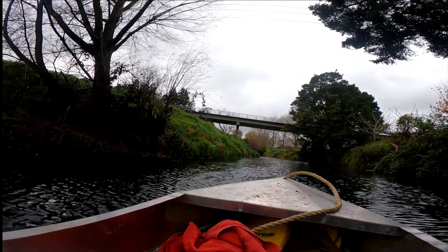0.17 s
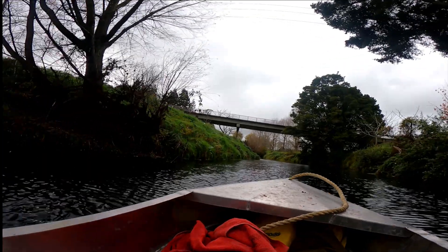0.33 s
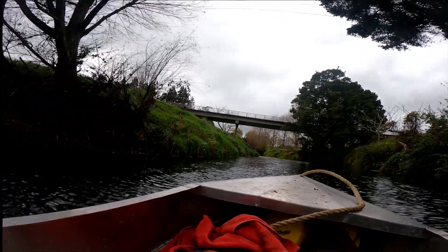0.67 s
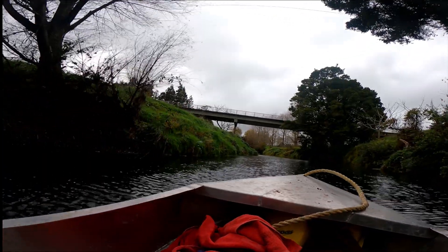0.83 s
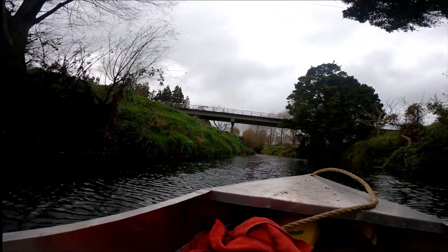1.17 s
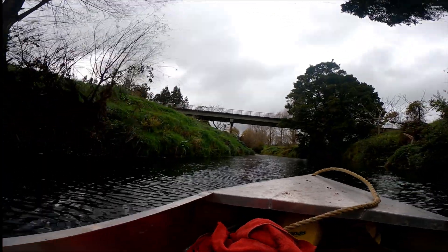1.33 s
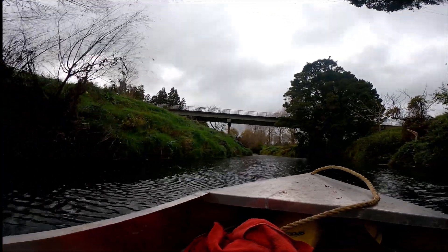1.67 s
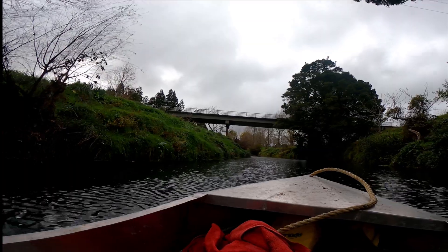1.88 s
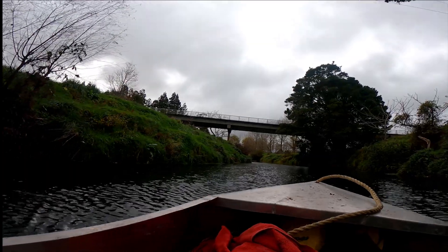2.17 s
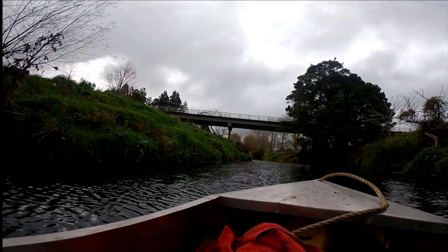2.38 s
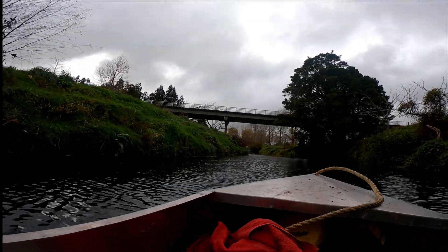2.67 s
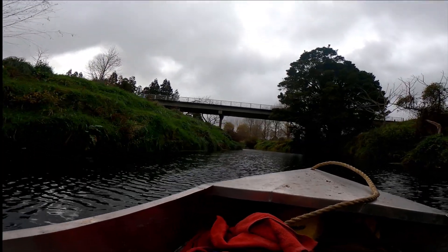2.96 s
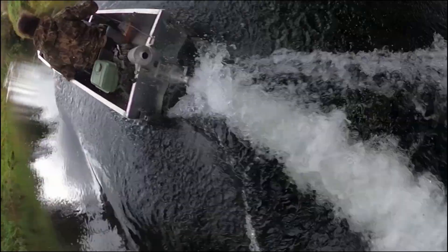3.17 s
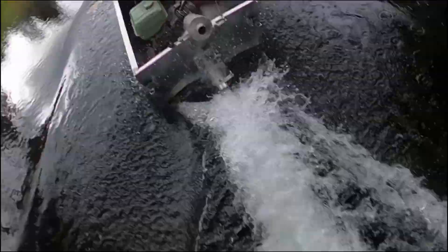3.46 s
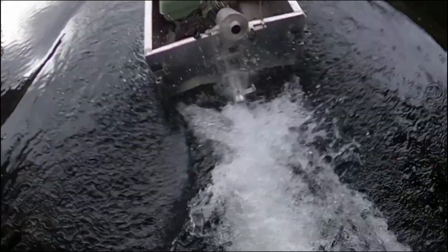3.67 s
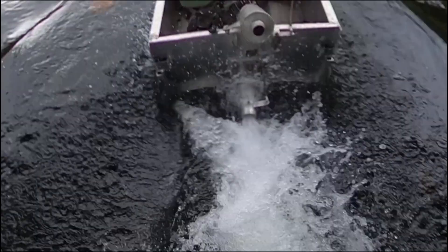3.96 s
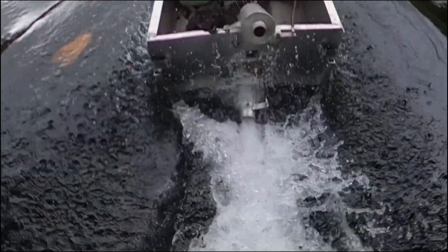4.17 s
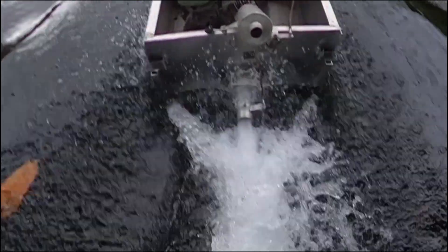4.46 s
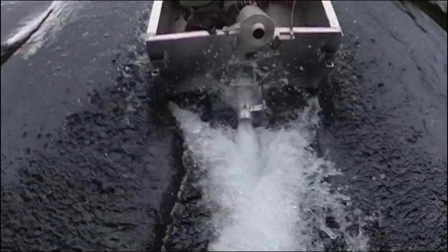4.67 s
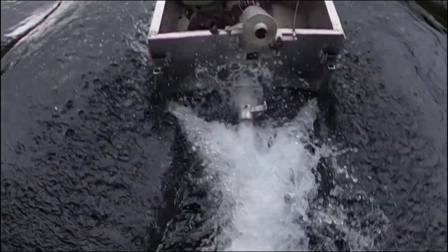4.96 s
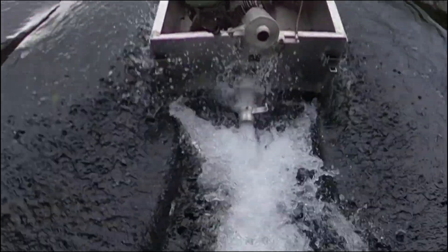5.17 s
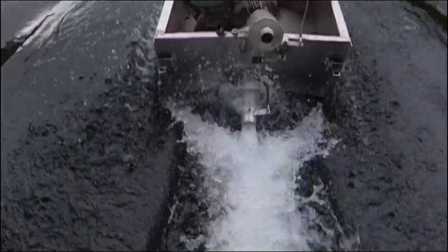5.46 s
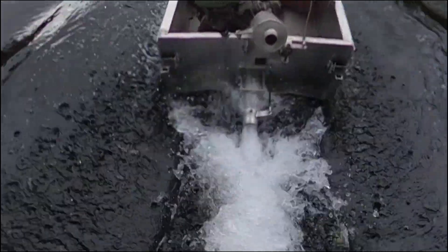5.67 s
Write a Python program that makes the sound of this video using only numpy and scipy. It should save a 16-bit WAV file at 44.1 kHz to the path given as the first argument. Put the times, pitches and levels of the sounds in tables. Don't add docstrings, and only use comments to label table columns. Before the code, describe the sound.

Rapid engine putter heard through a rattling metal hull, switching abruptly to crisp exhaust pops, hiss and churning white water at the stern.

```python
import sys
import numpy as np
from scipy import signal
from scipy.fft import rfft, irfft, next_fast_len
from scipy.io import wavfile
from scipy.ndimage import uniform_filter1d, map_coordinates

SR = 44100
rng = np.random.default_rng(int(sys.argv[2]) if len(sys.argv) > 2 else 0)


def unload_wav(signal):
    wavfile.write(
        sys.argv[1],
        SR,
        np.round(np.clip(np.atleast_2d(signal).T, -1, 1) * 32767).astype(np.int16),
    )


def volts_from_db(level):
    exponent = np.asarray(level, float) / 20
    return 10 ** exponent


N = 256662

CUT = 3.1625
COARSE = np.arange(0, N + 200, 200)


def unit(x):
    return x / np.sqrt(np.mean(x ** 2) + 1e-20)


def curves(rows):
    s, *columns = np.transpose(rows)
    return [np.interp(np.arange(N) / SR, s, column) for column in columns]


def wobble(rate):
    knots = rng.standard_normal(300)
    return np.interp(np.arange(N), COARSE, map_coordinates(knots, [COARSE * min(rate, 40) / SR]))


def swell(middle, length, at=np.arange(N)):
    return np.exp(-np.abs((at / SR - middle) / length * 2) ** 3)


def filtered(x, response):
    m = next_fast_len(N + 8192)
    return irfft(rfft(x, m) * response(np.fft.rfftfreq(m, 1 / SR)), m)[:N]


def noise(spectrum, patchy_db=0., rings=()):
    z = signal.stft(rng.standard_normal(N + 512), nperseg=512)[2]
    patches = uniform_filter1d(rng.standard_normal(z.shape), 6, 0)
    patches = unit(uniform_filter1d(patches, 8, 1))
    white = signal.istft(z * volts_from_db(patchy_db * patches), nperseg=512)[1][:N]
    f, db = np.transpose(spectrum)

    def colour(hz):
        bumps_db = sum(lift_db / (1 + ((hz - c) / w * 2) ** 2) for c, w, lift_db in rings)
        return volts_from_db(np.interp(np.log(hz + 1), np.log(f), db, right=-120) + bumps_db)

    return unit(filtered(white, colour))


def orders(cycle, table, twist, spread, unsteady, drift_db):
    total = np.zeros(N)
    twist = twist + np.zeros(501)
    on = np.gradient(cycle) > 0
    for k, db in table:
        k = round(k)
        share = unsteady * (1 + k / 10)
        wander = np.exp(1j * spread * k / 6 * rng.standard_normal())
        wander = wander + share * (wobble(4.04) + 1j * wobble(4.15))
        turning = np.exp(1j * (2 * np.pi * k * cycle[on] + twist[k]))
        total[on] += volts_from_db(db + drift_db[k][on]) * np.real(wander[on] * turning)
    return total / np.sqrt(sum(volts_from_db(2 * db) for _, db in table) / 2)


def burst(cycle, start, rise, fall, scatter_db, jitter):
    size, late = np.clip(rng.standard_normal((80, 2)).T, -2, 2)
    shifted = cycle - start + 2 * jitter
    k = np.floor(shifted).astype(int) + 3
    age = np.clip(shifted % 1 - jitter * (2 + late[k]), 0, 1)
    attack = 1 - np.exp(-(age / rise) ** 2)
    return volts_from_db(scatter_db * size[k]) * np.exp(-age / fall) * attack * (1 - age ** 6)


def spike(cycle, at, rise, fall, scatter_db, jitter):
    size, late = np.clip(rng.standard_normal((80, 2)).T, -2, 2)
    k = np.round(cycle - at).astype(int)
    age = cycle - at - k - jitter * late[k + 3]
    return volts_from_db(scatter_db * size[k + 3]) * np.exp(-np.abs(age) / np.where(age < 0, rise, fall))


def each(cycle, lead, levels_db):
    k = np.floor(cycle + lead).astype(int)
    return volts_from_db(levels_db[np.clip(k, 0, len(levels_db) - 1)])


# middle in seconds, length in seconds, panel pitch in Hz, lift in dB.
PANEL_WAVES = [(.2, 0.19, 85, 5.5), (0.302, 0.12, 402, 5), (.5, 0.34, 130, 0.5), (1.104, 0.27, 405, 15.5),
               (1.55, 0.58, 391, 3), (2.8, 0.94, 396, -3), (0.753, 0.62, 126, -2), (1.14, 0.83, 140.7, 9),
               (1.3, 0.57, 86, -7), (1.163, 0.89, 184, -3.5), (1.47, .25, 124, 5), (1.7, 0.17, 77, 5),
               (1.762, 0.73, 190, 6.5), (1.78, 0.19, 147, 3.5), (1.8, .5, 263, 3.5), (2.21, 0.16, 189, 6.5),
               (2.396, 0.52, 90.5, 4), (2.5, 0.2, 147, 3), (2.75, 0.19, 121, -2), (2.947, 0.12, 192, 5.5),
               (3.302, 0.19, 152, 4.5), (.1, 0.36, 273, -6), (.65, 0.14, 190, 5),
               (1.245, 0.43, 294.5, 15.5), (1.448, 0.15, 293, 6.5), (2.803, 0.45, 187, 2.5),
               (5.5, 0.16, 270, 2.5), (4.35, 0.51, 90, 5), (4.953, 0.34, 165, 2.5), (1.6, .3, 296, 7),
               (3.35, 0.25, 268, 11), (3.907, 0.31, 268, 9), (4.11, 0.13, 69, -23), (4.25, 0.37, 134, 8),
               (4.7, 0.42, 265, -14), (5.102, 0.21, 145, -20), (5.55, .35, 139, -9)]


def panels(cycle, at_s, table):
    order = np.round(np.transpose(table)[0]).astype(int)
    order_hz = order[:, None] * np.gradient(cycle)[round(at_s * SR)] * SR
    s, length, hz, lift_db = np.transpose(PANEL_WAVES)
    panel_width_hz = 29.5
    reach = np.exp(-((order_hz - hz) / panel_width_hz * 2) ** 4)
    lifts = reach * lift_db @ swell(s[:, None], length[:, None], COARSE)
    return {k: np.interp(np.arange(N), COARSE, lift) for k, lift in zip(order, lifts)}


# time in seconds, engine cycles counted.
BOW_TURNS = [(0, -.968), (.287, 3.975), (.862, 13.759), (1.437, 23.659), (2.3, 38.466), (3.2, 53.9)]


def bow_cycle():
    return curves(BOW_TURNS)[0]


# multiple of the firing rate, level in dB.
BOOM_ORDERS = [(1, -17), (2, -13), (3, -4.5), (4, -5.5), (5, 0), (6, -2), (7, -4), (8, 0), (9, -0.5),
               (10, -2), (11, 0), (12, -4), (13, -25.5), (14, -18), (15, -16), (16, -8), (17, -18.5),
               (18, -16.5)]


def boom(cycle):
    lift_db = panels(cycle, 1, BOOM_ORDERS)
    return volts_from_db(-16) * orders(cycle, BOOM_ORDERS, twist=3., spread=9., unsteady=.1, drift_db=lift_db)


# pitch in Hz, level in dB per Hz.
ROAR_SPECTRUM = [(15, -63), (25, -31.5), (75, -8), (185, -3), (229, -5), (283, -6), (344, -12.5),
                 (393, -11.5), (624, -13.5), (757, -20), (1030, -22), (1110, -23), (2500, -43.5),
                 (3250, -77), (5500, -120)]
# centre in Hz, width in Hz, lift in dB.
HULL_RESONANCES = [(172, 19, .3), (291, 42, 4.5), (408, 35, 3.5), (624, 40, 2.5), (965, 92, 5),
                   (1460, 80, 2), (2900, 270, 2)]
# time in seconds, level in dB.
HULL_SHAKING = [(0, -0.5), (.9, 1), (1.25, -2), (1.8, 0), (2.1, -1.3), (2.5, 1.8), (3.2, 0)]
# time in seconds, clatter in dB, rattle in dB.
HULL_FIRINGS = [(0.056, -2.0, -2.0), (0.114, -3.5, -2.0), (0.172, -3.0, -4.5), (0.23, -2.0, -2.0),
                (0.288, -0.5, -1.0), (0.347, -0.0, 0.5), (0.406, -0.5, -0.0), (0.465, 0.0, -0.5),
                (0.524, -2.0, -0.5), (0.582, -1.0, 1.5), (0.641, 1.5, 2.0), (0.7, 3.0, 2.5),
                (0.759, 1.0, 1.0), (0.817, 3.0, 1.5), (0.876, 0.0, 2.5), (0.934, -3.0, 1.0),
                (0.992, -0.5, 1.0), (1.05, -0.5, 1.5), (1.108, 0.0, 0.0), (1.166, -1.5, 0.5),
                (1.224, 0.5, -2.5), (1.283, 0.0, -1.0), (1.341, -3.0, -0.5), (1.399, -2.0, -0.5),
                (1.457, -1.5, -1.0), (1.515, -2.0, 0.5), (1.573, 1.0, -0.5), (1.632, -0.0, 0.5),
                (1.69, 0.0, 0.5), (1.748, -1.0, 0.0), (1.807, 0.5, 1.5), (1.865, 0.5, 1.5),
                (1.923, 0.5, -0.5), (1.981, -1.5, -1.0), (2.04, 2.5, -1.0), (2.098, -2.0, 1.5),
                (2.156, -1.0, 0.5), (2.215, 1.0, -1.0), (2.273, -2.0, 0.0), (2.331, 2.5, -0.0),
                (2.389, 0.5, -1.0), (2.448, 0.0, -0.0), (2.506, 3.0, 0.5), (2.564, -0.0, -0.5),
                (2.623, 1.0, -0.5), (2.681, 1.0, 2.0), (2.739, 0.0, 0.5), (2.798, 1.0, -0.5),
                (2.856, 0.0, 1.5), (2.914, 1.0, 1.0), (2.973, -1.0, 0.0), (3.031, 0.0, -1.0),
                (3.089, -1.0, -0.5)]


def roar(cycle):
    shaking_db, = curves(HULL_SHAKING)
    clatter_db = np.transpose(HULL_FIRINGS)[1]
    whole = noise(ROAR_SPECTRUM, patchy_db=0.28, rings=HULL_RESONANCES)
    deep = filtered(whole, lambda hz: 1 / (1 + (hz / 700) ** 4))
    chug = .5 + burst(cycle, start=-.1, rise=.07, fall=.45, scatter_db=2., jitter=.02)
    clatter = .75 + burst(cycle, start=-.3, rise=.12, fall=.5, scatter_db=.5, jitter=.03)
    clatter = clatter + .4 * spike(cycle, at=.03, rise=.04, fall=.08, scatter_db=2., jitter=.05)
    clatter = clatter * each(cycle, .35, 0.62 * clatter_db)
    return volts_from_db(-18.5) * (deep * chug * volts_from_db(shaking_db) + 1.135 * (whole - deep) * clatter)


# pitch in Hz, level in dB per Hz.
RATTLE_SPECTRUM = [(1060, -34.5), (1800, -4), (2490, -3.5), (4270, -6), (5450, -9.5), (6530, -10),
                   (8480, -16.5), (11200, -31), (12400, -25.5), (13800, -30), (15500, -36)]


def rattle(cycle):
    shake_db = np.transpose(HULL_FIRINGS)[2]
    shake = .62 + burst(cycle, start=-.42, rise=.16, fall=.45, scatter_db=.5, jitter=.025)
    shake = shake + .4 * spike(cycle, at=0, rise=.04, fall=.08, scatter_db=2., jitter=.03)
    shake = shake + .2 * spike(cycle, at=.3, rise=.04, fall=.06, scatter_db=4., jitter=.06)
    shake = shake * each(cycle, .4, 0.66 * shake_db)
    return volts_from_db(-42) * noise(RATTLE_SPECTRUM, patchy_db=1.0) * shake * volts_from_db(0.23 * wobble(32.0))


# multiple of the firing rate, level in dB.
COVER_HUM = [(19, -2), (21, -2), (22, 1), (23, 0), (24, 0), (27, -4), (34, -4), (36, -6)]


def cover(cycle):
    lift_db = panels(cycle, 1, COVER_HUM)
    return volts_from_db(-40) * orders(cycle, COVER_HUM, twist=0, spread=9., unsteady=.35, drift_db=lift_db)


# pitch in Hz, level in dB per Hz.
FITTING_SPECTRUM = [(3500, -24), (4800, -2), (6300, 0.5), (7500, -5), (9500, -38)]


def fitting(cycle):
    chatter = spike(cycle, at=-.03, rise=.04, fall=.06, scatter_db=2., jitter=.05)
    chatter = chatter + .5 * spike(cycle, at=.4, rise=.04, fall=.07, scatter_db=5., jitter=.06)
    level_db = -41 - 5 * (1 - swell(.55, .9))
    return volts_from_db(level_db) * noise(FITTING_SPECTRUM, patchy_db=1.2) * chatter


# pitch in Hz, level in dB per Hz.
TICK_SPECTRUM = [(6000, -30), (8500, -4), (11000, -12), (13000, 1.5), (15000, -6), (15800, -31)]
# time in seconds, level in dB.
TICK_LEVEL = [(0, -60), (1.5, -62), (2, -53), (2.5, -53), (3.2, -53)]


def tappet(cycle):
    level_db, = curves(TICK_LEVEL)
    tick = spike(cycle, at=.005, rise=.015, fall=.1, scatter_db=2.5, jitter=.02)
    return volts_from_db(level_db) * noise(TICK_SPECTRUM, patchy_db=2.) * tick


# pitch in Hz, level in dB per Hz.
WIND_SPECTRUM = [(5, -20.5), (15, -13), (35, -1), (70, -3.5), (140, -41)]
# middle in seconds, length in seconds, lift in dB.
WIND_GUSTS = [
    (.05, 0.74, 2),
    (2.7, 0.47, 14),
    (5.2, 0.33, 5.5),
]


def wind():
    steady_db = np.where(np.arange(N) < CUT * SR, -42, -35.5)
    level_db = steady_db + sum(lift_db * swell(s, length) for s, length, lift_db in WIND_GUSTS)
    return volts_from_db(level_db + 3.5 * wobble(4.9)) * noise(WIND_SPECTRUM)


# time in seconds, puff in dB, pop in dB, valve hiss in dB.
EXHAUST_FIRINGS = [(3.2228, -2.0, 0.5, 0.5), (3.2822, 0.0, -0.5, 2.0), (3.3416, 0.5, -0.5, -0.5),
                   (3.4012, 0.0, 0.5, 3.5), (3.4609, 0.5, 1.5, 0.5), (3.5213, 0.5, -1.5, 1.5),
                   (3.5815, 0.0, -1.5, 0.0), (3.6416, -1.0, -2.5, 2.0), (3.7018, -0.0, 1.5, -0.5),
                   (3.7615, -1.0, 2.5, -0.5), (3.8208, -0.5, 2.0, -0.0), (3.8797, -1.0, -2.0, 0.5),
                   (3.9387, 0.5, -0.0, 4.0), (3.9981, 0.0, -0.0, -0.5), (4.057, -2.0, 1.5, -3.0),
                   (4.1159, -1.5, 0.0, -0.5), (4.1745, -0.5, 0.0, 1.0), (4.2336, -0.5, -0.0, 1.0),
                   (4.2923, -2.0, 1.0, -2.0), (4.3506, 0.5, 0.5, -1.0), (4.4097, 0.0, 0.5, 2.5),
                   (4.4687, 0.0, -0.5, 0.5), (4.5268, -0.5, 1.0, -1.5), (4.5856, 1.0, -1.5, -0.5),
                   (4.6444, -0.5, -0.0, 2.0), (4.7034, -0.0, 0.5, -1.0), (4.7622, 0.0, -0.5, 0.5),
                   (4.8213, 0.5, -0.5, 0.5), (4.8801, -0.0, -3.0, 0.0), (4.9391, 0.5, -4.0, 2.5),
                   (4.9981, 0.5, 0.5, -1.5), (5.057, 0.5, -1.5, -3.0), (5.1157, -0.5, -2.0, -1.5),
                   (5.1747, -0.5, 0.5, -1.5), (5.2336, 0.5, -1.5, -0.5), (5.2928, 0.5, 1.0, -1.0),
                   (5.3518, -1.0, 2.0, -1.0), (5.4103, -0.0, 1.0, 1.5), (5.4688, -0.0, 2.5, -1.0),
                   (5.528, 0.0, -1.0, -1.5), (5.5878, -0.5, 1.5, 2.5), (5.6471, 1.0, -0.5, 4.0),
                   (5.7066, -0.5, -0.5, -1.5), (5.7658, 0.0, 0.5, 1.5)]


def stern_cycle():
    s = np.transpose(EXHAUST_FIRINGS)[0]
    cycle_s = .0593
    times = np.r_[s[0] - cycle_s, s, s[-1] + cycle_s]
    return curves(list(zip(times, np.arange(-1, len(s) + 1))))[0]


def puff(cycle):
    start, rise, fall, suction = -.012, .025, .014, .115
    age = (cycle + .5) % 1 - .5
    late = age - start
    push = np.where(late < 0, np.exp(-np.abs(late) / rise), np.exp(-(late / fall) ** 2))
    return push - np.sin(np.pi * np.clip(age / suction, 0, 1))


# multiple of the firing rate, level in dB.
THUD_ORDERS = [(1, -10), (2, -6), (3, -13), (4, 0), (5, -1), (6, -2), (7, -8), (8, -6), (9, -3), (10, -4),
               (11, -20), (12, -19), (13, -13), (14, -13), (15, -19), (16, -12), (17, -16), (18, -20)]


def thud(cycle, exhaust_db):
    timing = np.angle(rfft(puff(np.arange(1000) / 1000)))
    lift_db = panels(cycle, 4, THUD_ORDERS)
    beat = orders(cycle, THUD_ORDERS, twist=timing, spread=.3, unsteady=.06, drift_db=lift_db)
    return volts_from_db(-18 + exhaust_db) * beat


def puff_edge(cycle, puff_db, pop_db):
    puffs = puff(cycle) * each(cycle, .5, puff_db + pop_db)
    return volts_from_db(-8.5) * filtered(puffs, lambda hz: 1 / (1 + (290 / (hz + 1)) ** 8))


# pitch in Hz, level in dB per Hz.
JET_SPECTRUM = [(15, -35), (25, -5.5), (106, 4), (196, -4.5), (257, -4.5), (475, -19), (952, -22),
                (1090, -22), (1810, -19.5), (2560, -28.5), (2930, -26.5), (7680, -43), (11500, -59.5),
                (13500, -69), (15000, -90)]
# centre in Hz, width in Hz, lift in dB.
COVER_RESONANCES = [(972, 100, 6), (1470, 57, 1.5), (2890, 150, 3), (250, 25, -2), (391, 33, -2),
                    (587, 23, 1.5)]


def jet(cycle, exhaust_db):
    water = noise(JET_SPECTRUM, patchy_db=1., rings=COVER_RESONANCES)
    water = filtered(water, lambda hz: .34 + .66 / (1 + (200 / (hz + 1)) ** 4))
    deep = filtered(water, lambda hz: 1 / (1 + (hz / 650) ** 4))
    throb = .78 + .6 * burst(cycle, start=-.25, rise=.05, fall=.65, scatter_db=1.5, jitter=.02)
    level_db = -15 - 0.47 * exhaust_db
    return volts_from_db(level_db) * (deep + (water - deep) * throb) * volts_from_db(0.61 * wobble(30))


# pitch in Hz, level in dB per Hz.
POP_SPECTRUM = [(200, -19), (400, -8), (950, 5), (1600, 5.5), (3000, -11.5), (5000, -7.5), (9000, -58)]


def pop(cycle, pop_db):
    crack = spike(cycle, at=-.022, rise=.01, fall=.03, scatter_db=.5, jitter=.006)
    crack = crack * each(cycle, .5, 1.8 * pop_db)
    return volts_from_db(-16) * noise(POP_SPECTRUM, patchy_db=.7) * crack


# pitch in Hz, level in dB per Hz.
HISS_SPECTRUM = [(1500, -44), (3000, 14.5), (5000, 2.5), (8500, 5.5), (11000, -4.5), (13500, -13),
                 (14400, -24), (15200, -50)]


def valve_hiss(cycle, valve_db):
    valve = spike(cycle, at=-.062, rise=.007, fall=.045, scatter_db=.5, jitter=.008)
    valve = valve + .2 * spike(cycle, at=-.04, rise=.1, fall=.2, scatter_db=1., jitter=.02)
    return volts_from_db(-30) * noise(HISS_SPECTRUM, patchy_db=3.) * valve * each(cycle, .5, 0.96 * valve_db)


def bow():
    cycle = bow_cycle()
    hull = boom(cycle) + roar(cycle) + rattle(cycle)
    return hull + cover(cycle) + fitting(cycle) + tappet(cycle)


# time in seconds, level in dB.
EXHAUST_PRESSURE = [(3.16, -0.4), (3.65, -1.9), (3.95, -1), (4.1, -2), (4.25, -3), (4.6, -2), (5.15, -1),
                    (5.82, 0.8)]


def stern():
    _, puff_db, pop_db, valve_db = np.transpose(EXHAUST_FIRINGS)
    cycle = stern_cycle()
    exhaust_db, = curves(EXHAUST_PRESSURE)
    exhaust = thud(cycle, exhaust_db) + puff_edge(cycle, puff_db, pop_db)
    return exhaust + jet(cycle, exhaust_db) + pop(cycle, pop_db) + valve_hiss(cycle, valve_db)


def scene():
    t = np.arange(N) / SR
    join = round(CUT * SR)
    near = np.exp(-np.abs(t - CUT) / .0015)
    gusts = wind()
    before, after = bow() + gusts, stern() + gusts
    before = before + np.exp(-t / .001) * (.45 - before[0])
    before = before + near * (-.47 - before[join])
    after = after + near * (.47 - after[join])
    after = after * np.clip(np.arange(N)[::-1] / 40, 0, 1)
    return np.where(np.arange(N) < join, before, after)[None]


# start in seconds, end in seconds, depth from 0 to 1.
DULL_MOMENTS = [
    (4.299, 4.330, 1),
    (5.086, 5.102, 1),
]
# centre in Hz, width in Hz, level in dB.
DULL_LINES = [(5200, 160, 4), (6000, 160, 4), (7000, 260, 6)]


def dulled(x):
    t = np.arange(N) / SR
    lost = 0
    for start, end, depth in DULL_MOMENTS:
        inside = np.clip(np.minimum(t - start, end - t) / .004 + .5, 0, 1)
        lost = lost + depth * np.sin(np.pi / 2 * inside) ** 2

    def response(hz):
        return (hz < 4600) + sum(volts_from_db(db) * (abs(hz - c) < w / 2) for c, w, db in DULL_LINES)

    return x + lost * (filtered(x[0], response) - x)


def top_cut(x):
    return signal.sosfilt(signal.butter(12, 15710, fs=SR, output="sos"), x)


def record(dry):
    held = dry / (1 + np.abs(dry / .9) ** 4) ** .25
    mix = dulled(held) + .003
    return top_cut(mix)


dry = scene()
out = record(dry)
unload_wav(out)
```